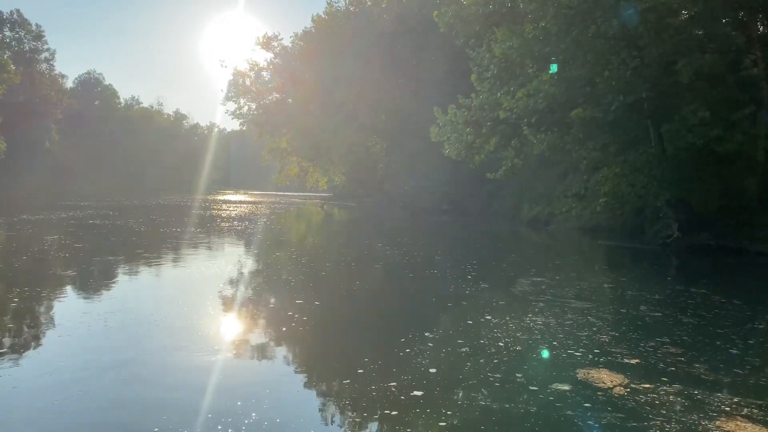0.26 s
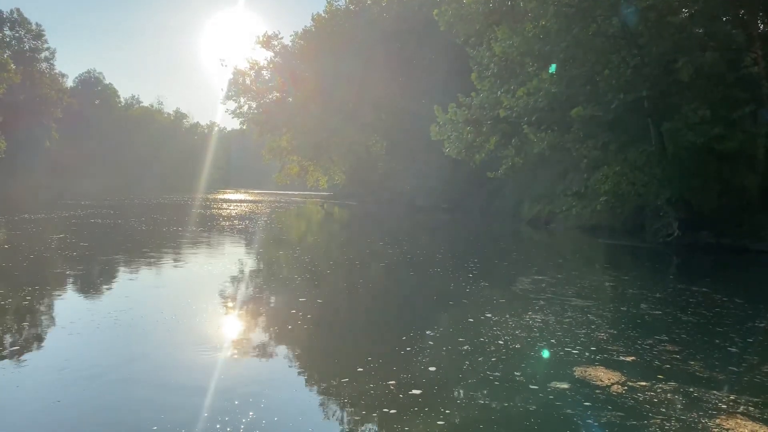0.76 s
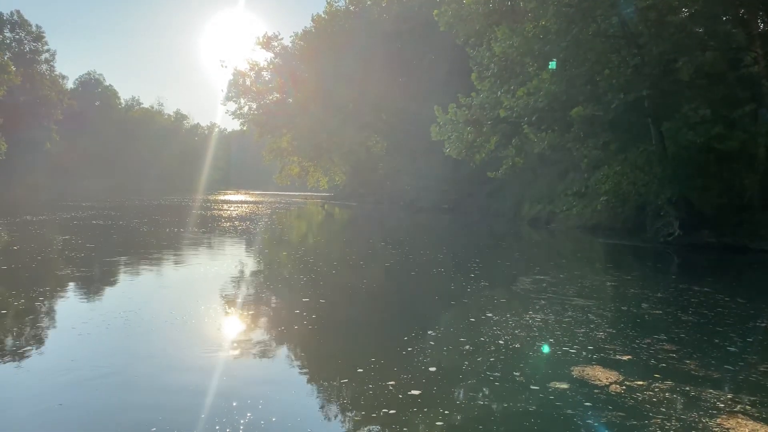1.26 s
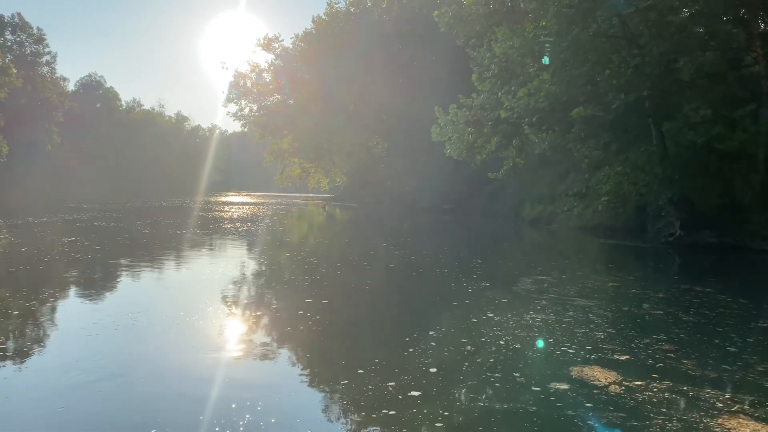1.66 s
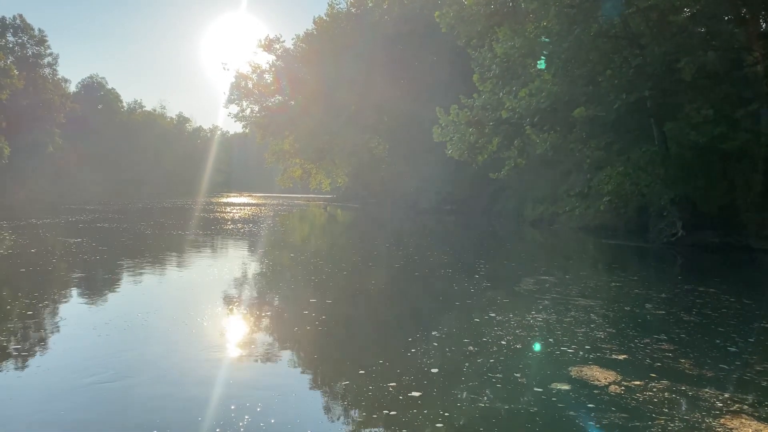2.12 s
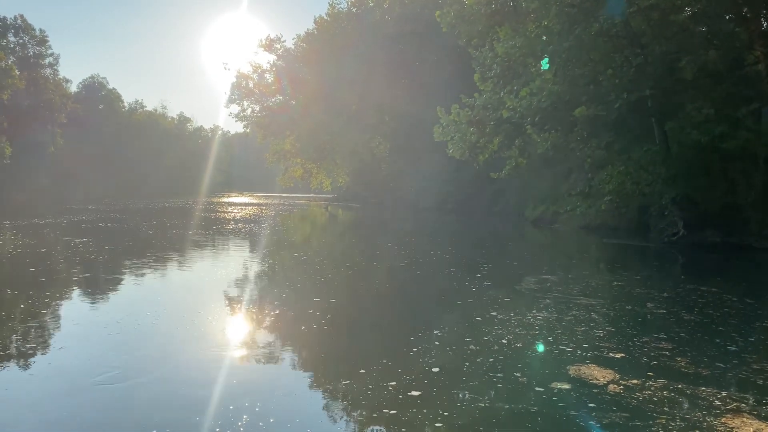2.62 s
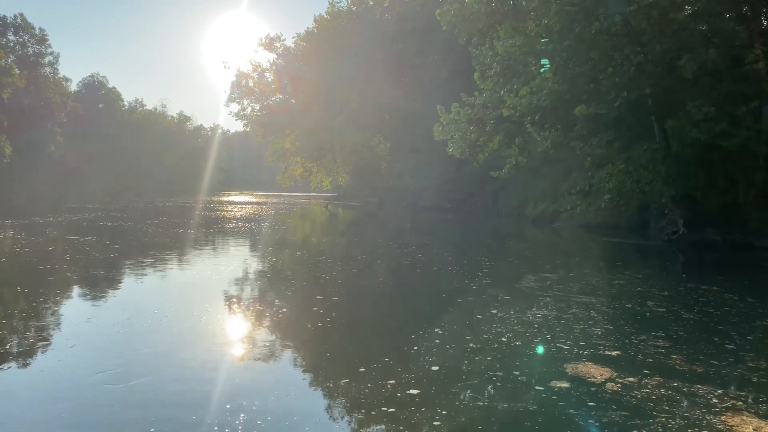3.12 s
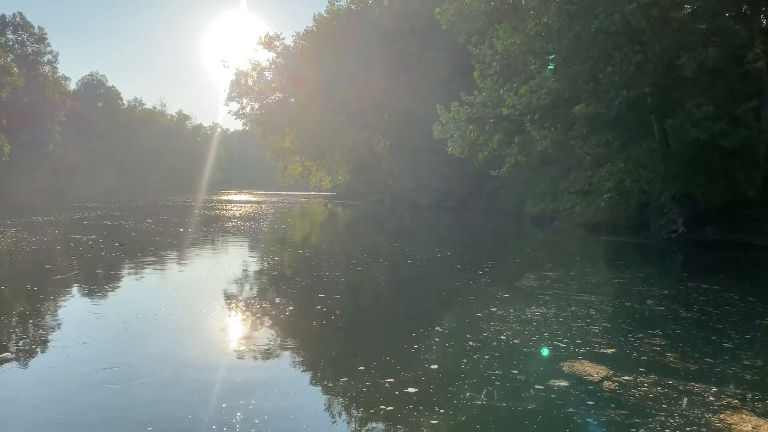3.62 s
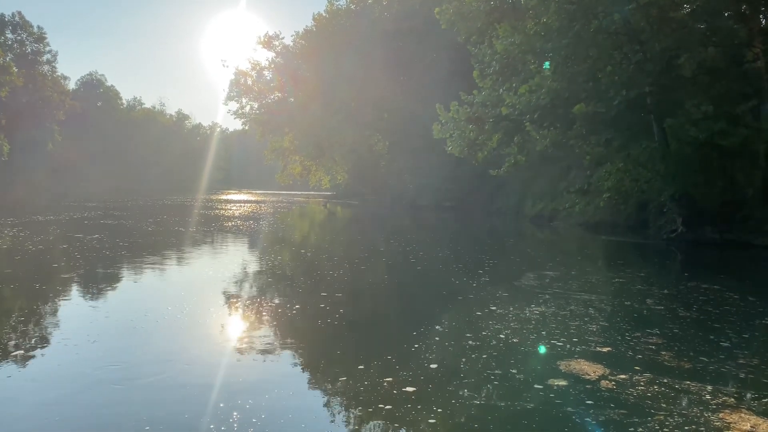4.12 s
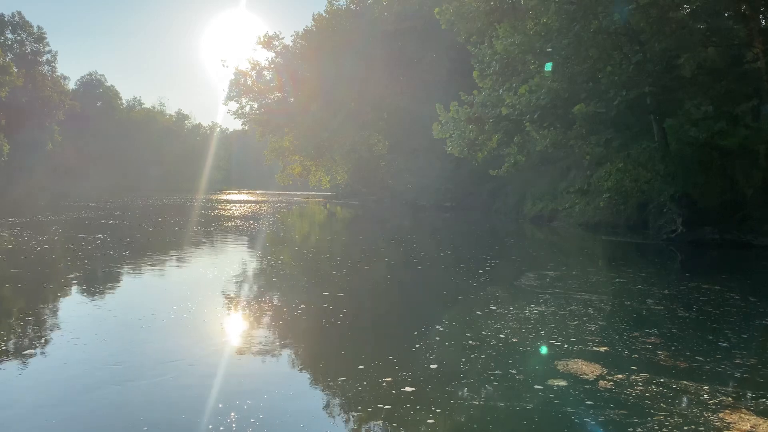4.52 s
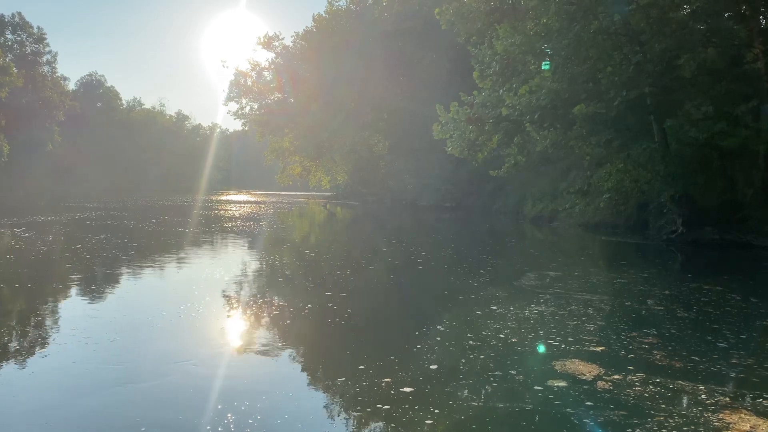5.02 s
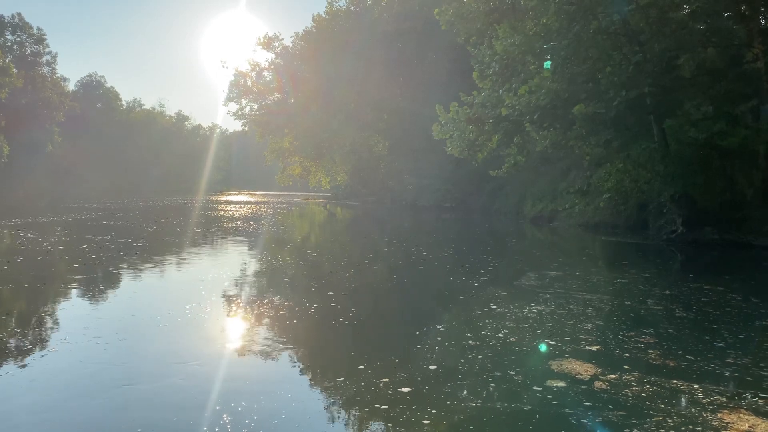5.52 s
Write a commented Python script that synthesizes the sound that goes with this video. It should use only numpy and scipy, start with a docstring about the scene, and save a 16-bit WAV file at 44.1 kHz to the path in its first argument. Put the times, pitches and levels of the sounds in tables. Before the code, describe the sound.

Rasping cicada calls repeat eight times in six seconds, bright buzz sliding lower, above a steady high hiss, faint water and rumbling air puffs.

```python
"""A cicada sings on a river bank: its two drum-like tymbals click in turn, faster and faster in a bright buzz,
then lock into a steady beat while two body resonances swoop down, and the buzz starts again. Each click is a
set of short, dying sine waves. Far cicadas sizzle (shaped noise that throbs), the river rushes (shaped noise),
and light air buffets the microphone (low noise that swells in puffs)."""
import sys
import numpy as np
from scipy import signal
from scipy.fft import rfft, irfft, next_fast_len
from scipy.io import wavfile
from scipy.ndimage import uniform_filter1d, map_coordinates

SR = 44100
rng = np.random.default_rng(int(sys.argv[2]) if len(sys.argv) > 2 else 0)


def to_wav(s):
    """Save 16-bit WAV."""
    ch = np.atleast_2d(s).T  # columns
    pcm = np.round(np.clip(ch, -1, 1) * 32767)  # PCM
    wavfile.write(sys.argv[1], SR, pcm.astype(np.int16))


N = 254456

# Tables. "t60" is the time a sound takes to die away by 60 dB.
# the calls: swoop_middle_s, buzz_db, slack_change_db, slack_main_pitch_hz, slack_low_pitch_hz
CALLS = [(.405, 0.5, 0.5, 3880, 2900), (.97, 2, -0.5, 3850, 2860), (1.665, 1.5, 0.5, 4040, 2970),
         (2.39, 1, -0.7, 3850, 2940), (3.218, 0.5, 4.3, 3594, 3010), (4.098, 0.5, 4, 3670, 3060),
         (5.025, 1, 4, 3680, 3020), (6.05, 1, -2, 3650, 3100)]
# ribs that buckle in one cycle, two for each tymbal, before the second tymbal's own level is added:
# place_in_cycle_share, level_db, pitch_relative_to_resonance
RIBS = [(0, 0, 1), (.16, -15, 1.08), (.487, 0, 1), (.63, -8, .93)]
# body resonances that keep their pitch: pitch_hz, t60_s, level_db
BODY_MODES = [(4090, .0028, -21), (4270, .02, -29), (4600, .025, -28), (5340, .014, -21), (5520, .014, -29)]
# how well the insect radiates through the leaves: pitch_hz, gain_db
RADIATION = [(1500, -58), (2350, -35), (2580, 0), (2760, 8), (2950, -1), (3300, 1.5), (3700, 1), (4050, 5),
             (4450, 5), (4750, 4.5), (4970, 6.5), (5150, 3.2), (5480, 5.5), (5720, 0.5), (6200, 6),
             (6550, 3.5), (7600, 3.5), (8200, -1), (9100, -6), (9800, 1.5), (10700, -13.5), (13000, -59)]
# how far the left channel leads the right for the cicada: pitch_hz, lead_radians
CICADA_LEAD = [(2750, 2.2), (2950, 2.5), (3300, 1.6), (3900, .6), (4500, .2), (4950, -1.6), (5400, -2.8),
               (6200, -.8), (7000, 1), (9500, 3)]
# how long the wooded bank echoes: pitch_hz, t60_s
TREE_DECAY = [(2500, 0.34), (5000, 0.84), (10000, 0.19)]
# tone color of the far cicadas: pitch_hz, level_db_per_hz (relative)
CHORUS_COLOR = [(2000, -20), (2550, -19.5), (2760, -17.5), (3080, -6), (3250, 3), (3480, -4), (4400, -4),
                (4700, 1.5), (4920, 1.5), (5150, -2.5), (5450, -5.5), (5720, -4.5), (6200, -5), (6600, -1),
                (7300, -10.5), (8200, -26.5), (11500, -32), (13000, -35)]
# tone color of the river: pitch_hz, level_db_per_hz (relative)
RIVER_COLOR = [(25, -22), (60, 2), (90, -5), (160, 1), (260, -2.5), (420, -4.5), (650, 2.5), (810, 0.5),
               (970, -9), (1300, -1.5), (1580, -10), (1880, -4), (2250, -14.5), (5000, -2.5), (14000, -73)]
# how alike the river is left and right: pitch_hz, likeness (1 = the same)
RIVER_ALIKE = [(100, 0.96), (700, 0.71), (1300, 1), (1750, 0.054), (3000, 0.22)]
# how far the left channel leads for the river: pitch_hz, lead_radians
RIVER_LEAD = [(100, 0.075), (600, 0.54), (900, 1.45), (1250, 0.53), (1700, 2.74), (2500, 5.9)]
# how much louder the river is on the left: pitch_hz, left_minus_right_db
RIVER_SIDE = [(200, 0.5), (800, 2), (1080, 10.5), (1500, -2.5), (2100, -1), (3000, 2)]
# tone color of the wind: pitch_hz, level_db_per_hz (relative)
BUFFET_COLOR = [(18, -26), (32, -16), (48, 3.5), (62, 2), (85, -6), (120, -8.5), (170, -30.5), (400, -34),
                (1000, -120)]
# slow breeze, before flutter and the wind's overall level: time_s, level_db
BREEZE = [(0, -70), (.5, -56.5), (1.5, -59.5), (2.6, -57.5), (3.4, -53.5), (3.9, -52), (4.7, -58.5),
          (5.25, -50), (5.77, -58)]
# stronger puffs of air, before the wind's overall level: peak_time_s, peak_db
PUFFS = [(1.04, -44.5), (1.68, -49.5), (3.15, -48), (3.22, -41.5), (3.33, -48), (3.42, -46.5), (3.65, -41),
         (4.012, -39), (4.121, -42.5), (4.17, -49), (4.355, -45.5), (4.405, -40.5), (4.485, -36),
         (4.73, -44.5), (5.145, -41.5), (5.23, -47.5), (5.37, -45)]

# Timing of the clicks
LOCKED_HZ, LOCKED_HZ_PER_S = 183.6, .46  # cycles a second when locked at the start, and how it creeps up
LOOSE_PACE, HURRY_S = .745, .06  # loose share of the locked rate; time scale of the speeding up
LOCK_LEAD_S = .04  # the beat is locked this long before the swoop
SETTLE_LEAD_S, SETTLE_S = .008, .015  # the ribs fall into step just before the swoop
LOOSE_SCATTER_MS, LOCKED_SCATTER_MS = .065, .011  # random timing of the ribs
PITCH_PER_MS = .25  # random pitch that goes with it (share per ms)

# Swoop and recovery of the abdomen
SWOOP_LEAD_S, SWOOP_S = .066, .07  # it starts to slacken early, gently at first
HOLD_S = .13  # it is let go this long after the swoop's middle
RECOVER_S, RECOVER_SCATTER = .092, .35  # it tightens again, unevenly (log spread)

# Pitch (Hz), ring (t60 in s) and relative level (dB) of the resonances
TAUT_HZ, TAUT_T60, SLACK_T60 = 4940, .0037, .004
BUZZ_HZ, BUZZ_T60, BUZZ_DB = 4940, .02, -16
OCTAVE_T60 = .003
LOW_HZ, LOW_T60, LOW_SLACK_T60 = 3290, .01, .0055
LOW_DB, LOW_LOCKED_DB, LOW_SLACK_DB = -18, 11.5, 6  # base level, then changes when locked and when slack

# Effort and levels
SECOND_DB, SECOND_LOCKED_DB = -3.5, -8  # the second tymbal, and its change once in step
SWELL_DB, SWELL_S = 3.3, .06  # effort peaks at the swoop
TIRE_AFTER_S, TIRE_S = .105, .018  # the call fades towards its end
REST_DB, REST_S = -3, 0.21  # how far effort sags, and how slowly it returns
DIRECT_DB, NEAR_DB, FAR_DB = -46, -48, -45.5  # the cicada's three paths to the microphone
PUFF_RISE_S, PUFF_FALL_S = 0.032, 0.029  # how fast a puff comes and goes
TOP_HZ = 12600  # nothing sounds above this


def amp(db):
    """Turn decibels into a gain."""
    return 10 ** (np.asarray(db) / 20)


def unit(x):
    """Scale x to an average strength (rms) of 1."""
    return x / np.sqrt(np.mean(x ** 2) + 1e-20)


def along(points, hz):
    """Read a table of (pitch, value) points at any pitch, on a log pitch scale."""
    f, v = np.transpose(points)
    return np.interp(np.log(hz + 1), np.log(f + 1), v)


def wobble(rate):
    """Draw a smooth random curve with rate random points a second."""
    knots = rng.standard_normal(int(N * rate / SR) + 4)
    return map_coordinates(knots, [np.arange(N) * rate / SR])


def filtered(x, response):
    """Change the strength and phase of each pitch in x, as response(hz) says."""
    m = next_fast_len(N + SR // 2)
    spectrum = rfft(x, m) * response(np.fft.rfftfreq(m, 1 / SR))
    return irfft(spectrum, m)[..., :N]


def ports(lead, side_db):
    """Give left and right gains: lead puts the left ahead in phase, side_db makes it louder."""
    phase = np.exp(.5j * np.array([lead, -lead]))
    return phase * amp(np.array([side_db, -side_db]).reshape(2, -1) / 2)


def rush(spectrum, alike, patchy_db):
    """Make stereo noise of rms 1 whose gain varies in random patches of time and pitch."""
    z = signal.stft(rng.standard_normal((2, N)), nperseg=512)[2]
    field = uniform_filter1d(rng.standard_normal(z.shape[1:]), size=6, axis=0)
    field = uniform_filter1d(field, size=14, axis=1)
    pair = signal.istft(z * amp(patchy_db * unit(field)), nperseg=512)[1][:, :N]

    def color_and_width(hz):
        # more of the shared noise where left and right are alike
        turn = np.arccos(np.clip(along(alike, hz), -1, 1)) / 2
        return amp(along(spectrum, hz)) * [np.cos(turn), np.sin(turn)]

    mid, side = filtered(pair, color_and_width)
    return unit(np.array([mid + side, mid - side]))


def rise(x):
    """Make a soft step from 0 to 1 round x = 0."""
    return .5 + .5 * np.tanh(x / 2)


def phrase(at):
    """For each time: its call, seconds from that call's swoop, seconds since the last call let go."""
    swoop = np.transpose(CALLS)[0]
    call = np.searchsorted(swoop[:-1] + HOLD_S, at)
    let_go = np.append(-np.inf, swoop + HOLD_S)
    return call, at - swoop[call], at - let_go[call]


def locking(from_swoop):
    """The tymbal muscles hurry ever more until they lock at 1."""
    return np.exp(np.minimum(from_swoop + LOCK_LEAD_S, 0) / HURRY_S)


def buckles(rib_drift=0.0038, pace_wander=0.025):
    """Find when each rib buckles and which it is; the ribs sit a little differently in every call."""
    now = np.arange(N) / SR
    _, from_swoop, _ = phrase(now)
    locked_rate = LOCKED_HZ + LOCKED_HZ_PER_S * now
    pace = LOOSE_PACE + pace_wander * wobble(12)  # unlocked, the beat is unsteady
    rate = locked_rate * (pace + (1 - pace) * locking(from_swoop))
    cycles = np.cumsum(rate) / SR
    cycle, rib = np.divmod(np.arange(int(cycles[-1]) * len(RIBS)), len(RIBS))
    call = phrase(np.interp(cycle, cycles, now))[0]
    drift = rib_drift * rng.standard_normal((len(CALLS), len(RIBS)))[call, rib]
    place = np.transpose(RIBS)[0][rib]
    return np.interp(cycle + place + drift, cycles, now), rib


def cicada(octave_db=-12, octave_locked_db=-6, slack_db=-26, scatter_db=1.0):
    """Each buckling rib rings two gliding resonances of the abdomen and the fixed body modes."""
    at, rib = buckles()
    _, rib_db, rib_pitch = np.array(RIBS)[rib].T
    swoop, *columns = np.transpose(CALLS)
    call_db, hold_db, slack_hz, low_slack_hz = (np.interp(at, swoop, column) for column in columns)
    _, from_swoop, since_last = phrase(at)
    lock = locking(from_swoop)
    in_step = rise((from_swoop + SETTLE_LEAD_S) / SETTLE_S)
    chance = rng.standard_normal((len(at), 4))

    # slack runs from 0 (taut) to 1; it recovers unevenly from click to click, so the buzz returns as a blur
    drop = 1 - np.exp(-(np.maximum(from_swoop + SWOOP_LEAD_S, 0) / SWOOP_S) ** 2)
    recover_s = RECOVER_S * np.exp(RECOVER_SCATTER * chance[:, 3])
    slack = np.maximum(drop, np.exp(-(since_last / recover_s) ** 2))

    # loose ribs give a rasp; locked ones repeat almost exactly and give clean lines
    scatter_ms = LOOSE_SCATTER_MS + in_step * (LOCKED_SCATTER_MS - LOOSE_SCATTER_MS)
    at = np.abs(at + chance[:, 0] * scatter_ms / 10 ** 3)
    pitch_scatter = 1 + PITCH_PER_MS * scatter_ms * chance[:, 1]
    hz = (TAUT_HZ + slack * (slack_hz - TAUT_HZ)) * rib_pitch * pitch_scatter

    tired = np.maximum(rise((from_swoop - TIRE_AFTER_S) / TIRE_S), np.exp(-since_last / REST_S))
    swell_db = SWELL_DB * np.exp(-np.abs(from_swoop) / SWELL_S)
    effort_db = call_db + slack * hold_db + swell_db + REST_DB * tired
    second_db = (SECOND_DB + SECOND_LOCKED_DB * in_step) * (rib >= 2)
    random_db = scatter_db * (1.5 - in_step / 2) * chance[:, 2]
    size = amp(effort_db + rib_db + second_db + random_db)

    # each click lasts 1/40 s; t is the time since its rib buckled
    index = np.ceil(at * SR).astype(int)[:, None] + np.arange(SR // 40)
    t = index / SR - at[:, None]

    def ring(f, t60):
        return np.sin(2 * np.pi * f * t) * np.exp(-np.log(1000) * t / t60)

    # the abdomen's damping follows its tension; the buzz mode and the octave fade as it slackens
    abdomen = ring(hz[:, None], np.interp(slack, [0, 1], [TAUT_T60, SLACK_T60])[:, None])
    octave = amp(octave_db + octave_locked_db * lock)[:, None] * ring(2 * hz[:, None], OCTAVE_T60)
    bright = amp(BUZZ_DB) * ring(BUZZ_HZ, BUZZ_T60) + octave

    # the low resonance gives way a little later, and grows and broadens as it sinks
    sunk = slack ** 1.6
    low_hz = LOW_HZ + sunk * (low_slack_hz - LOW_HZ)
    low_db = LOW_DB + LOW_LOCKED_DB * np.maximum(lock, sunk) + LOW_SLACK_DB * sunk
    low_t60 = np.interp(sunk, [0, 1], [LOW_T60, LOW_SLACK_T60])
    low = amp(low_db)[:, None] * ring(low_hz[:, None], low_t60[:, None])
    body = sum(amp(level) * ring(f, t60) for f, t60, level in BODY_MODES)

    # the low one swings against the others, which cuts the song off steeply below it
    click = abdomen + amp(slack_db * slack)[:, None] * bright + body - low
    # add every click into the song at its own time
    song = np.bincount(index.ravel(), (size[:, None] * click).ravel(), N)[:N]
    return unit(filtered(song, lambda f: amp(along(RADIATION, f))))


def echo(x, decay):
    """Leaves and trunks scatter the sound into a dying tail, different left and right."""
    hz, t, z = signal.stft(rng.standard_normal((2, SR // 2)), SR, nperseg=256)
    fade = np.exp(-np.log(1000) * t / along(decay, hz)[:, None])
    tail = signal.istft(z * fade, SR, nperseg=256)[1]
    # so many small surfaces return every pitch about equally
    for _ in range(3):
        tail = irfft(np.exp(1j * np.angle(rfft(tail, 2 * SR))))[:, :SR // 2]
    return unit(signal.fftconvolve(x[None], tail, axes=1)[:, :N])


def singer():
    """The near cicada reaches us straight, off the branches round it and off the wooded bank."""
    song = cicada()
    direct = filtered(song, lambda hz: ports(along(CICADA_LEAD, hz), side_db=0.5))
    branches = echo(song, [(4000, 0.087)])  # pitch_hz, t60_s
    bank = echo(song, TREE_DECAY)
    return amp(DIRECT_DB) * direct + amp(NEAR_DB) * branches + amp(FAR_DB) * bank


def chorus(level_db=-46, stroke_hz=135, throb=0.056):
    """Distant cicadas merge into a sizzle in which one stroke rate still shows."""
    strokes = np.cumsum(stroke_hz + 3 * wobble(6.1)) / SR
    alike = [(3000, -0.15), (4200, 0.65), (5400, 0.14), (7000, 0.063)]  # pitch_hz, left-right likeness
    sizzle = rush(CHORUS_COLOR, alike, patchy_db=1.5)
    swell = amp(level_db + 0.031 * wobble(4.7)) * (1 + throb * np.sin(2 * np.pi * strokes))
    return swell * sizzle * amp([[-.7], [.7]])  # a little louder on the right


def river(level_db=-51.0):
    """Shallow water makes an even rush of noise, a little to the left."""
    water = rush(RIVER_COLOR, RIVER_ALIKE, patchy_db=1.5)
    return amp(level_db) * filtered(water, lambda hz: ports(along(RIVER_LEAD, hz), along(RIVER_SIDE, hz)))


def wind(level_db=-2.0, flutter_db=1.5, flutter_rate=16):
    """A fluttering breeze and short puffs push on the microphone in soft, low lumps."""
    now = np.arange(N) / SR
    breeze = amp(np.interp(now, *np.transpose(BREEZE)) + flutter_db * wobble(flutter_rate))
    puffs = np.zeros(N)
    for peak_s, peak_db in PUFFS:
        width_s = np.where(now < peak_s, PUFF_RISE_S, PUFF_FALL_S)
        puffs += amp(peak_db) * np.exp(-((now - peak_s) / width_s) ** 2)
    lumps = rush(BUFFET_COLOR, [(50, 0.59)], patchy_db=-1.5)
    # even out the lumps' strength, so that the breeze and puffs set the level
    power = uniform_filter1d(np.mean(lumps ** 2, axis=0), size=SR // 16)
    strength = np.sqrt(np.abs(power) + 1e-6)
    return amp(level_db) * np.hypot(breeze, puffs) * lumps / strength * amp([[1.5], [-1.5]])  # louder left


def scene():
    """Add up all that sounds on the bank."""
    return singer() + chorus() + river() + wind()


def record(dry):
    """Remove everything from the top frequency upward."""
    return filtered(dry, lambda hz: hz < TOP_HZ)


dry = scene()
out = record(dry)
to_wav(out)
```